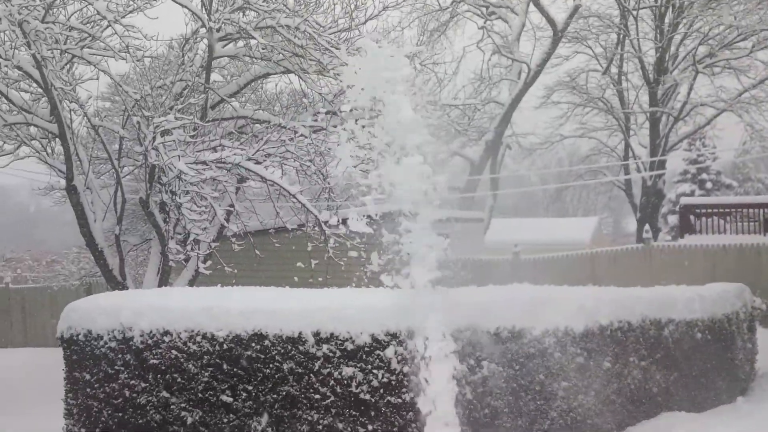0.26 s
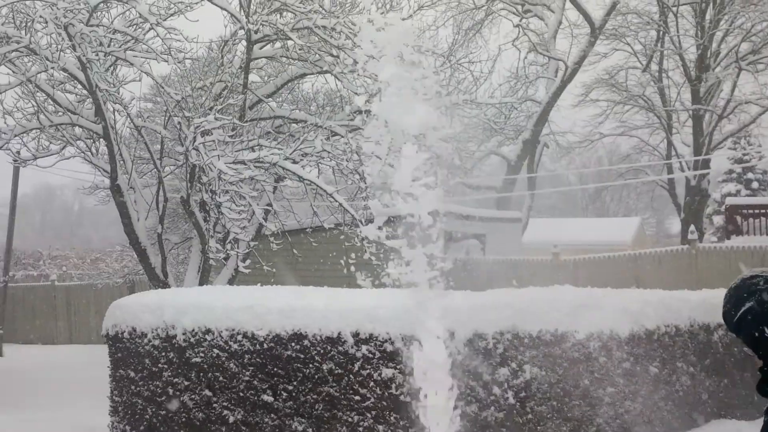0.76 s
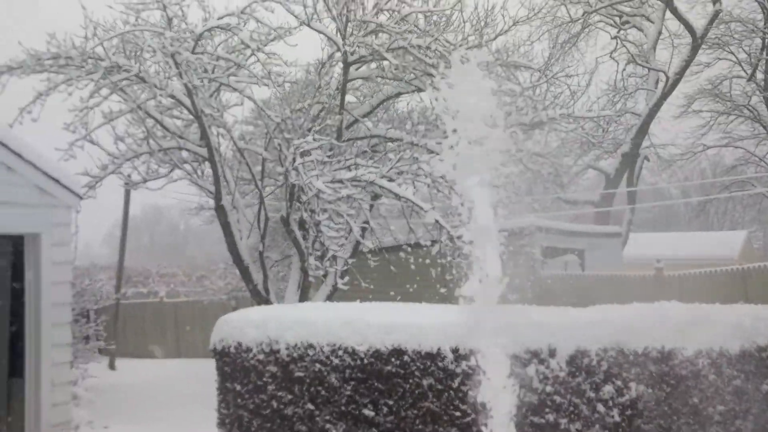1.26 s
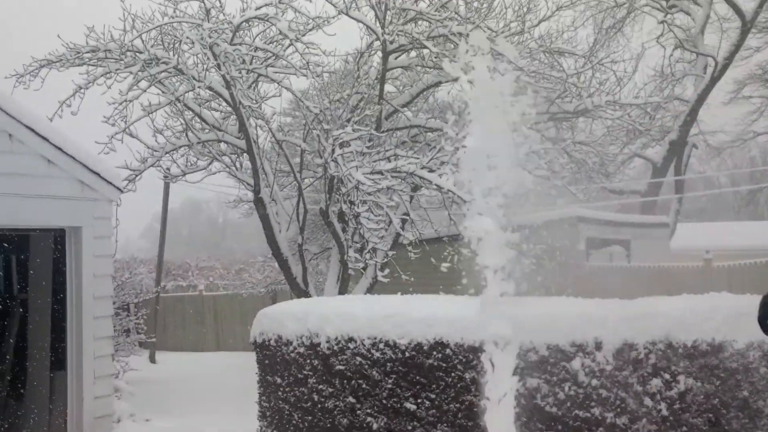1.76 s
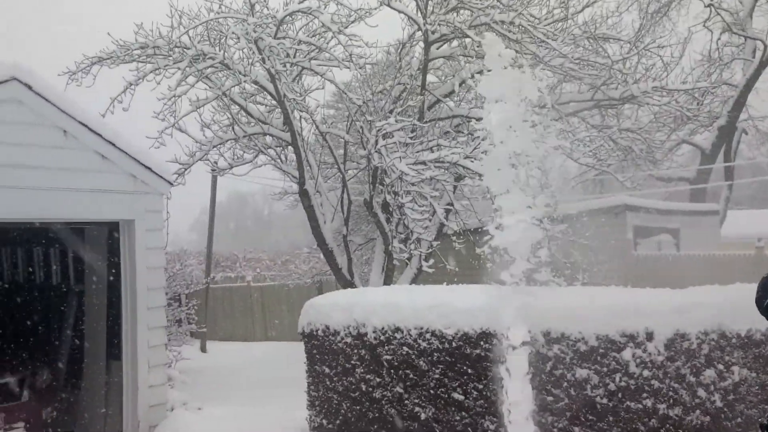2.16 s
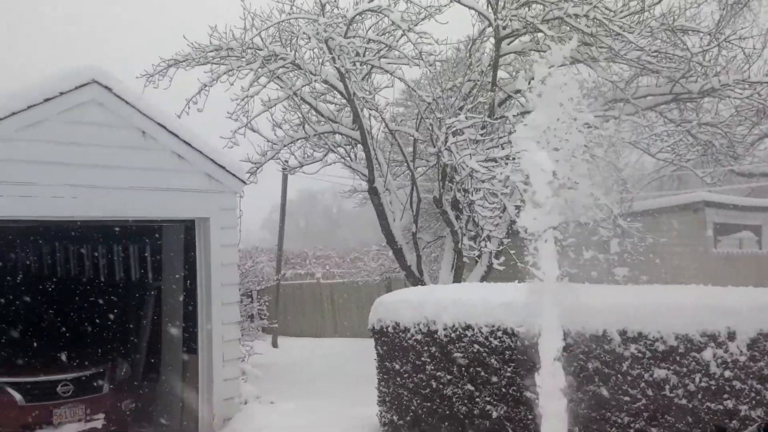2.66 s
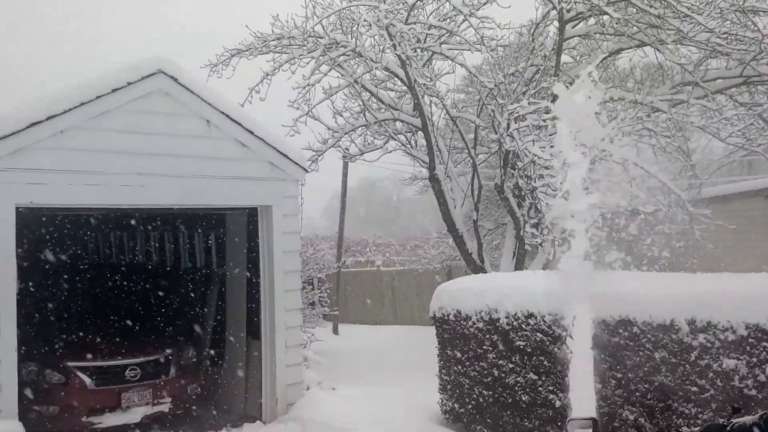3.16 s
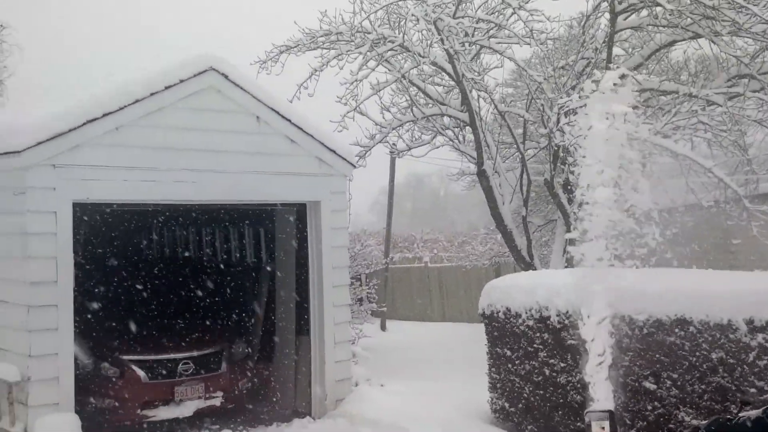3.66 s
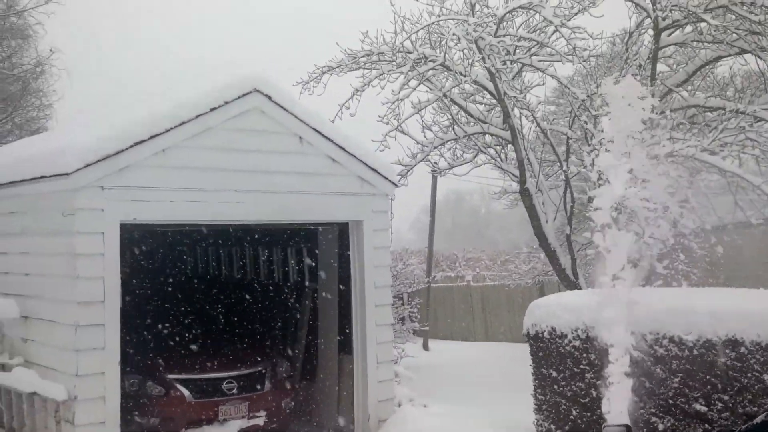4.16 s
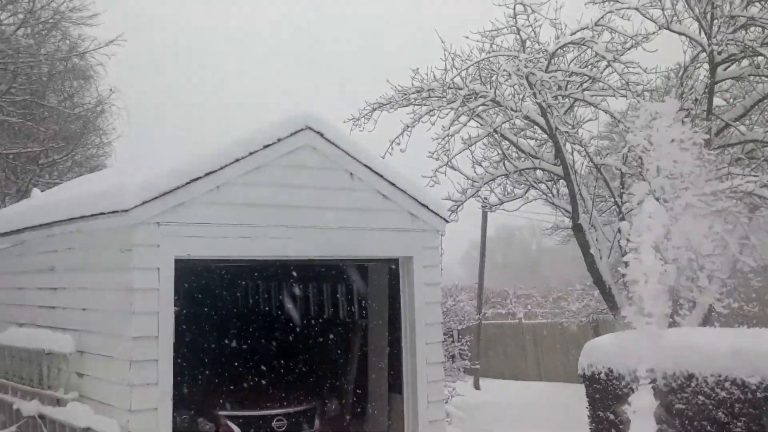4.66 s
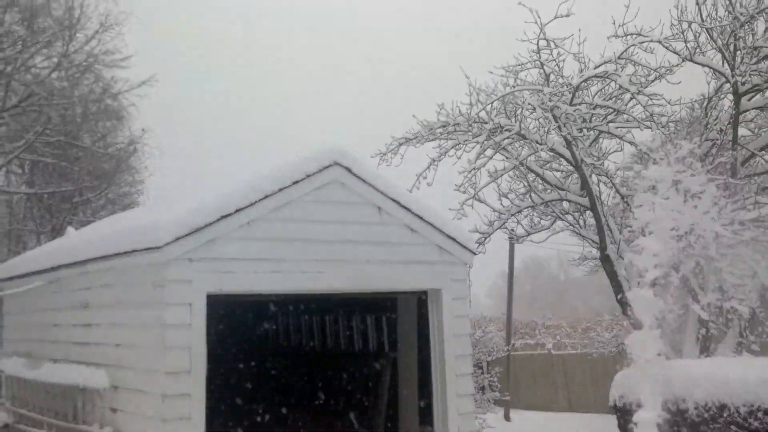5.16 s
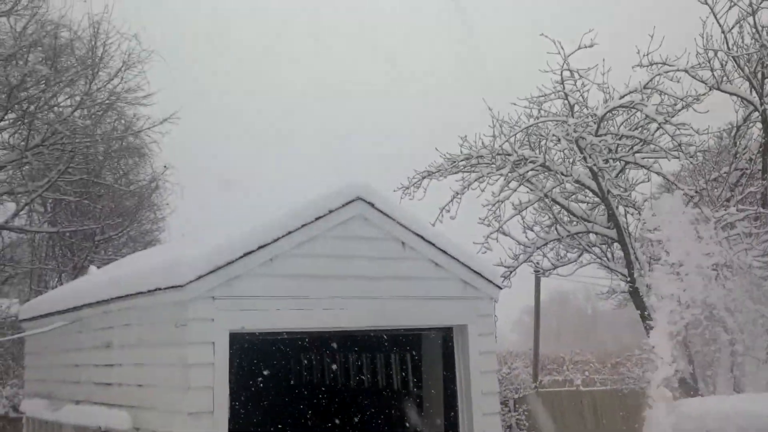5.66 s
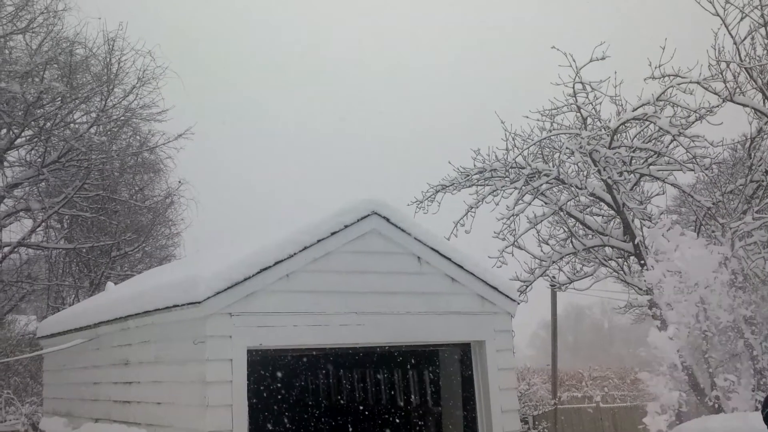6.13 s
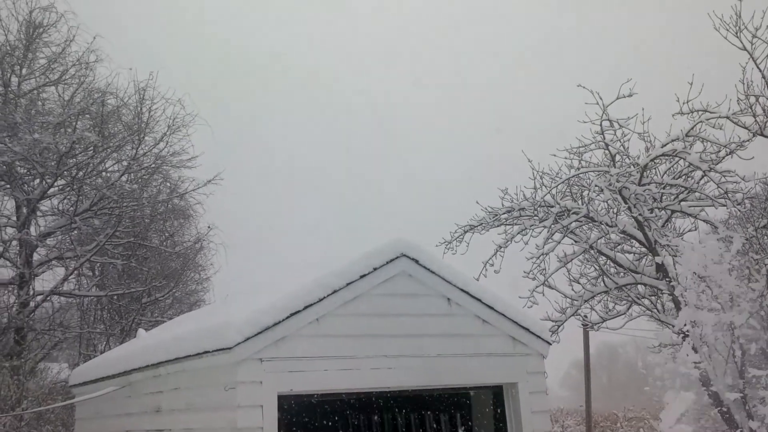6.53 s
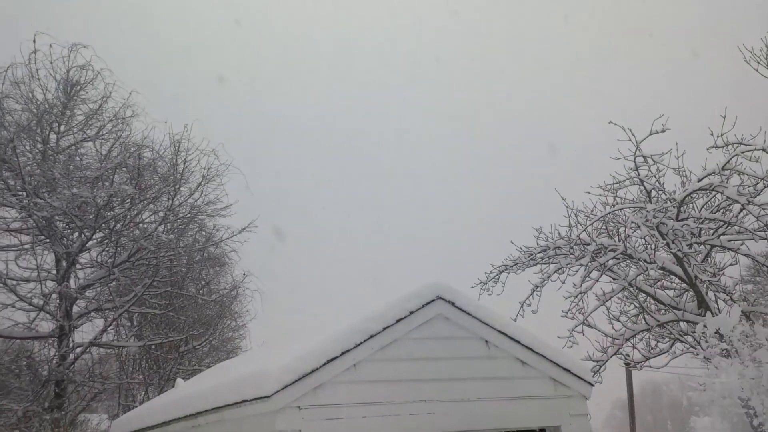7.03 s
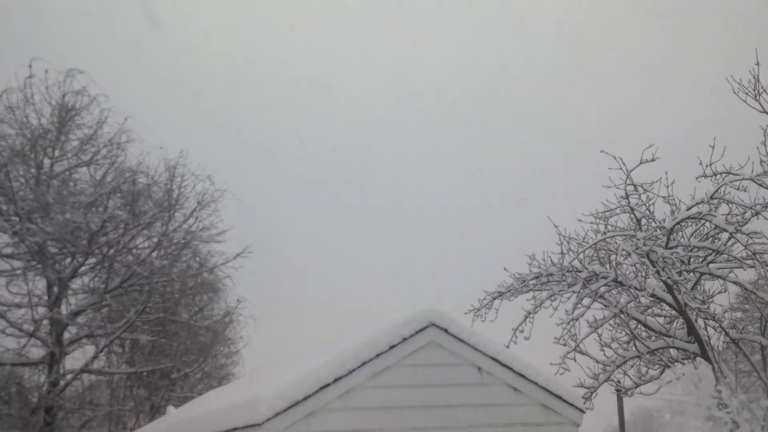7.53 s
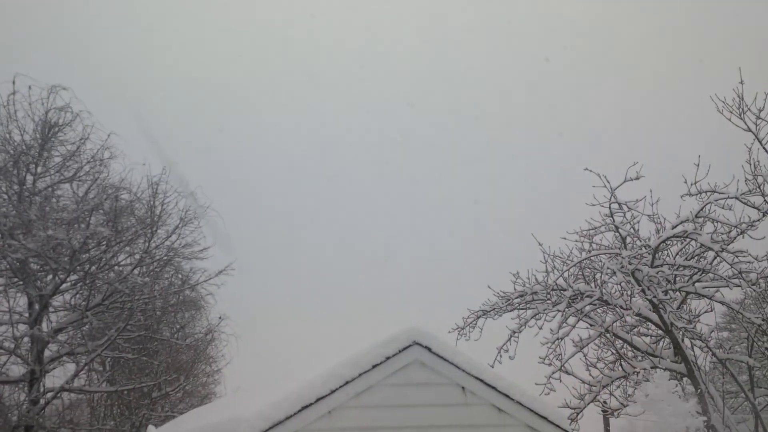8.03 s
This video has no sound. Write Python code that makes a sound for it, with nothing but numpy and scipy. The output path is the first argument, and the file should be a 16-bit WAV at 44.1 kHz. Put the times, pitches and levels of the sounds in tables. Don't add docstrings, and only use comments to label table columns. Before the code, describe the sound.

A snowblower engine chugs in a fast, throaty roar with metallic rattle, slowly receding to the left, with snow ticks and two sharp pops.

```python
import sys
import numpy as np
from scipy import signal
from scipy.fft import rfft, irfft
from scipy.io import wavfile
from scipy.ndimage import uniform_filter1d

SR = 44100
rng = np.random.default_rng(int(sys.argv[2]) if len(sys.argv) > 2 else 0)


def generate_wav(sig):
    pcm = np.round(np.clip(np.atleast_2d(sig).T, -1, 1) * 32767).astype(np.int16)
    wavfile.write(sys.argv[1], SR, pcm)


def voltage_ratio(decibels):
    exponent = np.asarray(decibels, float) / 20
    return 10 ** exponent


N = 365588
SECONDS = np.arange(N) / SR

# time_s, rate_cycles_per_s
FIRING_RATE = [(0.0, 28.744), (0.65, 29.58), (0.84, 29.066), (1.47, 29.396), (1.83, 29.211), (2.11, 29.439),
               (2.98, 29.449), (3.54, 29.301), (3.81, 29.617), (4.13, 28.942), (4.44, 29.537),
               (4.6, 29.292), (6.16, 29.446), (6.33, 29.522), (7.06, 29.427), (7.46, 29.69), (7.61, 29.434),
               (8.29, 29.707)]
# time_s, distance_m
DISTANCE = [(0, 4.2), (.7, 4.05), (1.4, 4.35), (1.8, 4.4), (2.4, 4.4), (3.1, 4.98), (3.6, 4.48),
            (4.15, 5.76), (4.5, 5.5), (5.1, 5.9), (5.6, 6.97), (6.2, 6.73), (6.6, 7.6), (7.3, 7.7),
            (8.29, 8.2)]
# time_s, far_share_0_to_1
FAR_SHARE = [(0, 0), (2, .15), (3.8, .3), (4.0, .88), (5.5, .95), (8.29, 1)]
# time_s, far_share_0_to_1
ROAR_FAR_SHARE = [(0, 0), (2.3, .1), (5.5, .85), (8.29, 1)]

# multiple_of_firing_rate, level_db
THUMP_ORDERS = [(1, -12), (2, -3), (3, -12.5), (4, 2.5), (5, -1), (6, -17), (7, -15), (8, -8.5), (9, -11.5),
                (10, -11), (11, -19.5), (12, -19), (13, -28.5), (14, -33)]

# place_cycles, pitch_hz, t60_s, near_db, far_db, timing_scatter_ms
MUFFLER_KNOCKS = [(0.311, 1282, 0.05, 1.5, -7.5, 0.04), (0.309, 1341, 0.11, -3, -7, .03),
                  (0.311, 530.8, 0.21, 3, -3, 0.04), (0.369, 792, 0.055, 1, -26.5, 0.023),
                  (.37, 771, 0.14, -26.5, -1, 0.024), (.94, 466.8, 0.068, 3, -2.5, 0.047),
                  (.16, 644, 0.093, -4.5, 3.5, 0.032), (0.461, 900, 0.064, -5, -5, 0.039),
                  (0.931, 1070, 0.054, -3.5, -12.5, 0.066)]
# place_cycles, pitch_hz, t60_s, near_db, far_db, timing_scatter_ms
CASING_KNOCKS = [(.86, 1950, .02, -1, -1, .2), (.96, 1900, .02, -1, -1, .2), (.96, 1750, .02, 0, -6, .2),
                 (.3, 1650, .02, -3, -6, .2), (.9, 2480, .035, -5, -3, .2), (.67, 2500, .03, -12, -4, .2),
                 (.98, 3220, .03, -4, -6, .4), (1.0, 3650, .035, -6, -4, .4)]
# pitch_hz, t60_s, near_db, far_db
PANEL_MODES = [(1980, .04, -2, -3), (2500, .05, -3, -1), (3230, .04, -4, -8), (3480, .04, -4, -8),
               (3680, .05, -5, -6)]
# pitch_hz, t60_s, near_db, far_db
RATTLE_MODES = [(4730, .03, -9.5, -8), (5670, 0.053, -6, -1.5), (6170, 0.037, -1.5, -10),
                (6760, .025, -4, -8), (8320, 0.014, -1.5, -13.5), (9140, .02, -5, -18)]

# pitch_hz, density_db_per_hz
ROAR_COLOURS = [
    [(15, -41.5), (25, -16), (71, -21.5), (128, -2.5), (191, -6.5), (296, -4), (391, -18.5), (449, -8.5), (525, -12.5), (583, -10.5), (870, -11), (1130, -19.5), (1320, -14.5), (1490, -24.5), (1600, -22), (2080, -52), (3520, -120)],
    [(15, -28), (25, -13), (48, -17.5), (75, -6), (128, -13), (188, 1.5), (267, -5.5), (391, -32.5), (457, -9.5), (636, -5.5), (706, -14), (770, -7), (983, -18.5), (1320, -12), (1600, -23), (2080, -51), (3520, -120)],
]
# pitch_hz, density_db_per_hz
CASING_COLOURS = [
    [(850, -37.5), (1450, -22), (1520, -16.5), (1740, 5.5), (1840, -5.5), (1960, -0.5), (2290, -3.5), (2690, -5.5), (2950, -11.5), (3320, -12), (3510, -17.5), (4560, -43), (7720, -120)],
    [(850, -41.5), (1450, -16.5), (1520, -26), (1670, -14), (1860, -7.5), (1990, -7.5), (2100, -14), (2310, -13), (2420, -13), (2500, -8), (2890, -20.5), (3120, -15), (3510, -19.5), (4560, -47.5), (7720, -120)],
]
# pitch_hz, density_db_per_hz
RATTLE_COLOURS = [
    [(3700, -21), (4100, -2.5), (4600, -6.5), (5100, -5), (5450, 0), (5800, -5.5), (6800, -6.5), (7500, -15), (8300, -12), (9200, -23.5), (10200, -23), (12000, -32), (13200, -47.5), (14500, -56.5), (15800, -53.5)],
    [(3700, -33.5), (4100, -0.5), (4600, -5.5), (5100, -3.5), (5450, 0), (5800, -7), (6800, -11.5), (7500, -24), (8300, -19.5), (9200, -24), (10200, -27.5), (12000, -25.5), (13200, -50.5), (14500, -52), (15800, -58.5)],
]
# pitch_hz, density_db_per_hz
WIND_COLOUR = [(20, -2), (40, -4), (100, -7), (200, -14.5), (400, -30), (1000, -76.5)]

# place_cycles, rise_cycles, fall_cycles, level_db
ROAR_BURSTS = [(.38, .07, .1, -10), (.96, .05, .06, -10)]
CASING_BURSTS = [(.96, .1, .11, 1), (.33, .03, .05, -6)]
RATTLE_BURSTS = [(.03, .06, .08, 5.5), (.92, .04, .06, 1), (.28, .06, .07, 0)]
SHAKES = [(.9, .03, .04, 9), (.99, .04, .06, 13)]

# pitch_hz, left_minus_right_db
PORT_BALANCE = [(60, 3), (170, 3), (330, 7.1), (520, 7.4), (860, 10.1), (1200, 9.2), (1900, 6.2),
                (2300, 1.8), (3300, 7.1), (4500, 7.8), (6200, 2.9), (8300, 2), (12000, 4)]
# pitch_hz, likeness_0_to_1
PORT_LIKENESS = [(60, 0.8), (500, 0.93), (1200, 0.82), (2240, 0.83), (2600, .8), (3300, 0.41), (4300, 0.13),
                 (5500, 0.39), (8000, 0.28), (12000, .3)]
# pitch_hz, left_lead_rad
PORT_LEAD = [(30, .1), (170, .35), (520, .45), (1500, .1), (1900, .75), (2600, 1.8), (3300, 2.4),
             (4000, 2.8), (5500, 4.6), (8000, 5.5)]
# time_s, share_of_balance
TURNING = [(0, 1.33), (3.5, 1.44), (4.5, 1.35), (8.29, 1.1)]

# start_s, level_db, dull_part_db, hiss_db
CLATTER_TICKS = [(0.04, -40.5, -8, -7), (0.213, -63, 0, -5), (0.419, -44, -2, -9), (0.52, -46, 6, -9.5),
                 (0.9315, -38, -2, -12.5), (0.966, -42.5, -2, -2.5), (1.0011, -36.5, -16, -8.5),
                 (1.068, -43.5, 3, -8.5), (1.1364, -43.5, -4, -13.5), (1.275, -54.5, 16, -15),
                 (1.3405, -50.5, 9, -5), (1.3766, -41.5, -2, -5.5), (1.547, -56, 0, -6), (1.9894, -50, -1, -14),
                 (2.0233, -57.5, 6, 0.5), (2.5, -59.5, 0, -0.5), (3.36, -61, 12, -5), (3.425, -59.5, 5, -4.5),
                 (4.1324, -39.5, -7, -16), (4.7473, -65.5, 6, -1), (4.916, -55, 8, -4.5),
                 (5.2645, -37.5, -2, -12.5)]
# start_s, level_db, pitch_hz, left_minus_right_db
GRAINS = [(0.0747, -52.5, 9390, 14), (0.6883, -49, 8370, 10), (1.292, -37.5, 10800, 4),
          (2.295, -57.5, 10800, 5), (2.566, -56, 8350, 7), (2.6005, -55, 8660, 11),
          (3.0916, -57.5, 10800, 9), (3.112, -47.5, 11200, 2), (3.8866, -45, 10700, -5),
          (3.96, -55.5, 12500, -1), (4.2353, -51.5, 11660, 14), (4.44, -56, 12000, 4),
          (4.6099, -58, 8740, 3), (4.764, -37.5, 9600, -12), (5.156, -56, 12400, 9),
          (6.328, -50.5, 9930, -13), (6.651, -51, 9100, 8), (6.8543, -54, 8500, -4),
          (6.8646, -44, 10100, -10), (7.2, -52, 9200, -2), (7.767, -45, 10940, -2.5), (8.108, -52, 8000, 0),
          (8.2033, -48, 10500, -6)]
# start_s, level_db, length_ms
POPS = [
    (3.8860, -5, .5),
    (3.8875, 1.5, .35),
    (4.1323, -9, .7),
    (4.1336, 1.5, .28),
]
# start_s, level_db, pitch_hz, t60_s
CLACK = (4.1322, -25, 3250, .018)


def evened(x):
    return x / np.sqrt(np.mean(x ** 2) + 1e-20)


def read(points, hz):
    f, value = np.transpose(points)
    return np.interp(np.log(hz + 1), np.log(f + 1), value)


def curve(rows):
    return np.interp(SECONDS, *np.transpose(rows))


def add(mix, s, sound):
    part = mix[round(s * SR):][:len(sound)]
    part += sound[:len(part)]


def ring(hz, t60, swings=1):
    t = np.arange(3000) / SR
    build_up = 1 - np.exp(-(t * hz / swings) ** 2)
    mode = build_up * voltage_ratio(-60 * t / t60) * np.sin(2 * np.pi * hz * t)
    return mode / np.linalg.norm(mode)


def receding(near_db, loss_db):
    return voltage_ratio(near_db - loss_db * np.log2(curve(DISTANCE) / 4))


def gate(cycles, bursts, force_db):
    loudness = np.ones(N)
    for place, rise, fall, db in bursts:
        turn = cycles - place + 1.5
        late = turn % 1 - .5
        shape = np.where(late < 0, np.exp(-(late / rise) ** 2), np.exp(-abs(late) / fall))
        loudness += voltage_ratio(db + force_db)[turn.astype(int)] * shape
    return evened(loudness)


def noise(colours, patchy_db, drift=FAR_SHARE):
    frames, hz = N // 512 + 5, np.fft.rfftfreq(2048, 1 / SR)
    a, b, c, d, patches = rng.standard_normal((frames, 1025, 5)).T
    patches = evened(uniform_filter1d(uniform_filter1d(patches, size=20, axis=0), size=7, axis=1))
    left, unrelated = a + 1j * b, c + 1j * d
    same = read(PORT_LIKENESS, hz)[:, None]
    z = np.array([left, same * left + np.sqrt(1 - same ** 2) * unrelated])
    near, far = (voltage_ratio(read(colour, hz)) for colour in colours)
    away = np.interp(np.arange(frames) * 512 / SR, *np.transpose(drift))
    z *= np.outer(near / np.linalg.norm(near), 1 - away) + np.outer(far / np.linalg.norm(far), away)
    z *= voltage_ratio(patchy_db * (1 + (hz[:, None] / 9000) ** 2) * patches)
    return evened(signal.istft(z, nperseg=2048, noverlap=1536)[1][:, :N])


def knocks(cycles, table, uneven_db, swings=1):
    out, count = np.zeros(N), np.arange(260)
    for place, hz, t60, near_db, far_db, scatter_ms in table:
        size, slip = rng.standard_normal((260, 2)).T
        at = np.interp(count + place, cycles, SECONDS, right=N / SR + 1) + scatter_ms * slip / 1000
        away = np.interp(at, *np.transpose(FAR_SHARE))
        gains = voltage_ratio(near_db + (far_db - near_db) * away + uneven_db * size)
        mode = ring(hz, t60, swings)
        for s, gain in zip(np.maximum(at, 0), gains):
            add(out, s, gain * mode)
    return evened(out)


def jangle(shake, modes):
    near = sum(voltage_ratio(near_db) * ring(hz, t60, swings=4.6) for hz, t60, near_db, _ in modes)
    far = sum(voltage_ratio(far_db) * ring(hz, t60, swings=4.6) for hz, t60, _, far_db in modes)
    chatter, away = shake * rng.standard_normal(N), curve(FAR_SHARE)
    near_part = signal.oaconvolve(chatter * (1 - away), near)[:N]
    return evened(near_part + signal.oaconvolve(chatter * away, far)[:N])


def thump(cycles):
    out = np.zeros(N)
    for k, db in THUMP_ORDERS:
        size, slip = (np.interp(cycles, np.arange(260), v) for v in rng.standard_normal((260, 2)).T)
        phase = 2 * np.pi * k * (cycles - .345) + 1.3 + .04 * k * slip
        out -= voltage_ratio(db + np.sqrt(k) * size) * np.cos(phase)
    return evened(out)


def muffler_roar(cycles, force):
    roar = noise(ROAR_COLOURS, patchy_db=1.0, drift=ROAR_FAR_SHARE) * gate(cycles, ROAR_BURSTS, force)
    return voltage_ratio(2.0) * roar + voltage_ratio(-3.5) * knocks(cycles, MUFFLER_KNOCKS, uneven_db=1.5)


def casing_clatter(cycles, force, shake):
    clatter = voltage_ratio(-1.5) * noise(CASING_COLOURS, patchy_db=1.5) * gate(cycles, CASING_BURSTS, 1.5 * force)
    clatter += voltage_ratio(-5) * knocks(cycles, CASING_KNOCKS, uneven_db=2.5, swings=3)
    return clatter + voltage_ratio(-10) * jangle(shake, PANEL_MODES)


def loose_rattle(cycles, force, shake):
    looseness = np.clip(rng.standard_normal(300), -2, 2)
    looseness = evened(uniform_filter1d(looseness, size=3))
    loudness = gate(cycles, RATTLE_BURSTS, 2 * force + 3 * looseness)
    rattle = voltage_ratio(-1.5) * noise(RATTLE_COLOURS, patchy_db=2.0) * loudness
    return rattle + voltage_ratio(-8) * jangle(shake, RATTLE_MODES)


def engine():
    cycles = np.cumsum(curve(FIRING_RATE)) / SR - .153
    force = np.clip(rng.standard_normal(300), -2, 2)
    shake = gate(cycles, SHAKES, 2.5 * force)
    low = receding(near_db=-19, loss_db=5) * thump(cycles)
    roar = receding(near_db=-24.5, loss_db=6.5) * muffler_roar(cycles, force)
    casing = receding(near_db=-37, loss_db=8) * casing_clatter(cycles, force, shake)
    rattle = receding(near_db=-55, loss_db=6.5) * loose_rattle(cycles, force, shake)
    return low + roar + casing + rattle


def ports(x):
    hz, t, z = signal.stft(x, SR, nperseg=1024)
    turning = np.interp(t, *np.transpose(TURNING))
    ratio = voltage_ratio(-np.outer(read(PORT_BALANCE, hz), turning))
    lag = np.exp(-1j * read(PORT_LEAD, hz))[:, None]
    z = z * 2 / (1 + ratio) * np.array([np.ones_like(ratio), ratio * lag])
    return signal.istft(z, SR, nperseg=1024)[1][:, :N]


def wind():
    z = rfft(rng.standard_normal((N, 2)).T) * voltage_ratio(read(WIND_COLOUR, np.fft.rfftfreq(N, 1 / SR)))
    return voltage_ratio(-43) * evened(irfft(z, N))


def pan(out, s, sound, pan_db):
    add(out[0], s, sound * voltage_ratio(pan_db / 2))
    add(out[1], s + 1 / SR, sound * voltage_ratio(-pan_db / 2))


def soft_tick(hz, t60):
    tick = signal.fftconvolve(ring(hz, t60), ring(hz, t60))[:3000]
    return tick / np.linalg.norm(tick)


def clatter_ticks():
    out = np.zeros((2, N))
    for s, db, dull_db, hiss_db in CLATTER_TICKS:
        tick = soft_tick(8160, t60=.0019) + voltage_ratio(dull_db) * soft_tick(6000, t60=.0015)
        pan(out, s, 4.5 * voltage_ratio(db) * tick, pan_db=7.5)
        for side in out:
            burst = rng.standard_normal(600) * np.hanning(600) / 8
            hiss = np.convolve(burst, ring(14600, t60=.004)[:300])
            add(side, s - .005, 5.1 * voltage_ratio(db + hiss_db) * hiss)
    return out


def snow_grains():
    out = np.zeros((2, N))
    for s, db, hz, pan_db in GRAINS:
        tick = ring(hz, t60=.0035, swings=2.5) + voltage_ratio(-9) * soft_tick(6500, t60=.002)
        pan(out, s, 6.4 * voltage_ratio(db) * tick, pan_db)
    return out


def wet_pops():
    out = np.zeros((2, N))
    t = np.arange(600) / SR * 1000
    for s, db, ms in POPS:
        push = (1 - np.exp(-(t / .2) ** 2)) * np.exp(-t / ms) * 2.3
        swing = .6 * ms * t * np.exp(-t / 1.7)
        add(out[1], s, voltage_ratio(db) * (push - swing))
    return out


def stone_clack():
    out = np.zeros((2, N))
    s, db, hz, t60 = CLACK
    pan(out, s, 5.9 * voltage_ratio(db) * ring(hz, t60, swings=2), pan_db=0)
    return out


def scene():
    return ports(engine()) + wind() + clatter_ticks() + snow_grains() + wet_pops() + stone_clack()


def low_pass(x):
    return signal.sosfilt(signal.butter(12, 15830, fs=SR, output="sos"), x)


def record(dry):
    return low_pass(np.clip(dry, -1, 1))


dry = scene()
out = record(dry)
generate_wav(out)
```